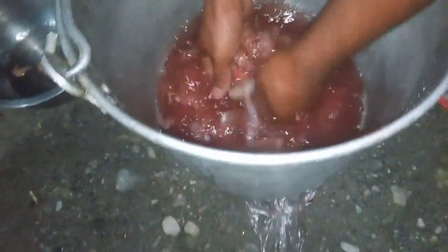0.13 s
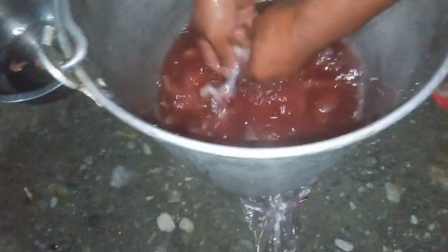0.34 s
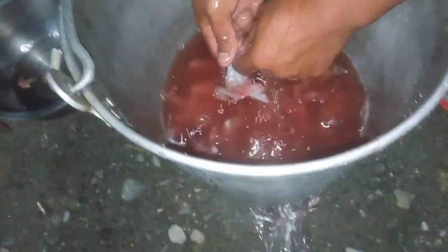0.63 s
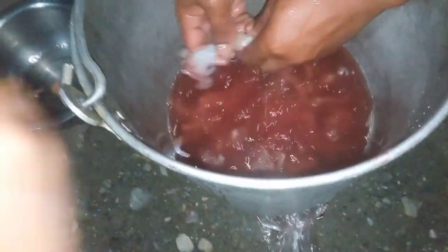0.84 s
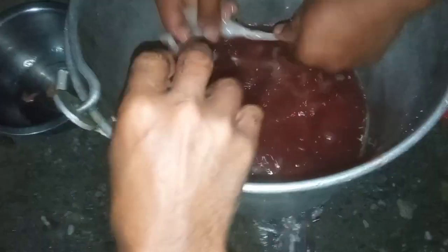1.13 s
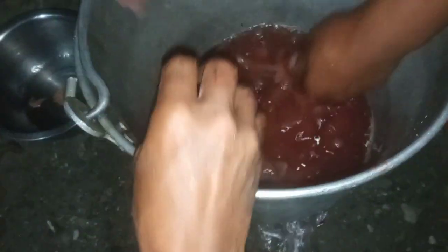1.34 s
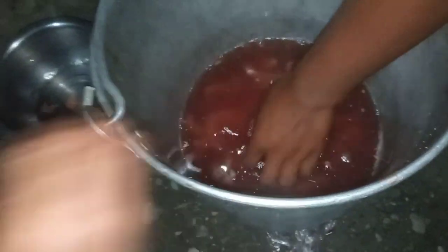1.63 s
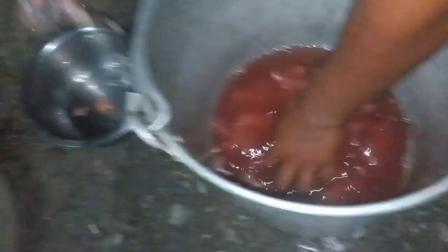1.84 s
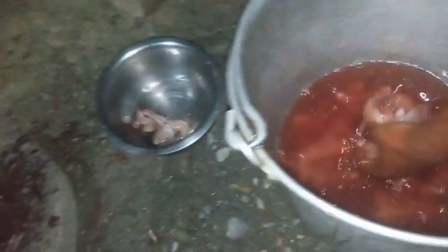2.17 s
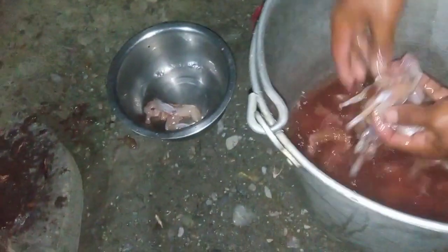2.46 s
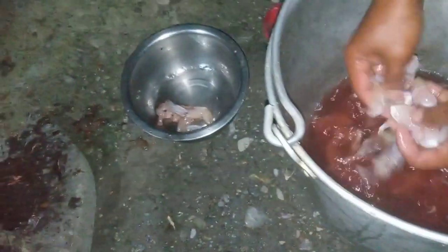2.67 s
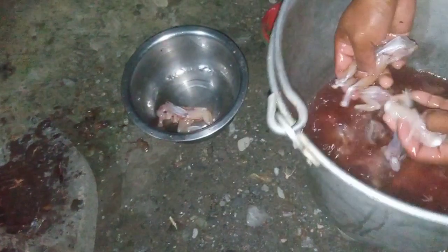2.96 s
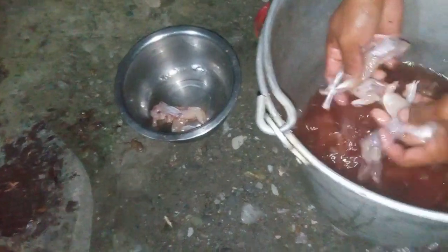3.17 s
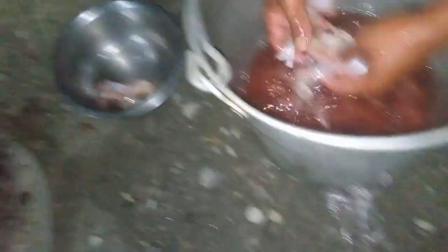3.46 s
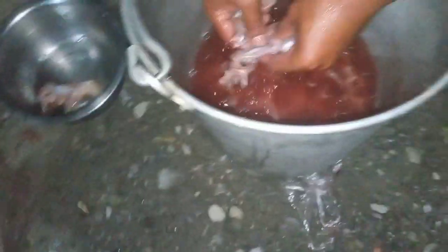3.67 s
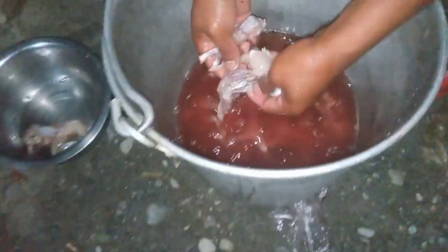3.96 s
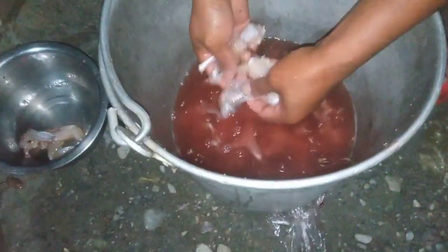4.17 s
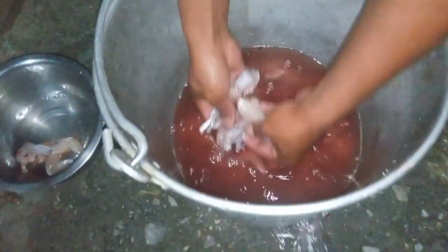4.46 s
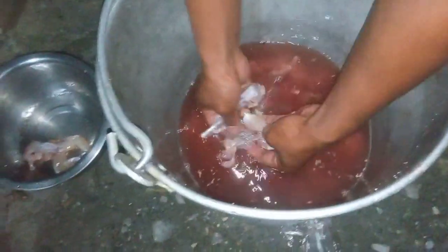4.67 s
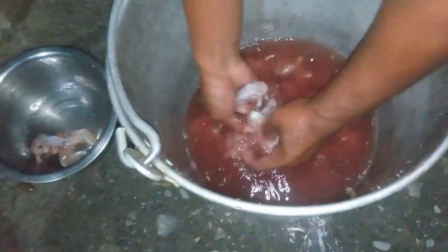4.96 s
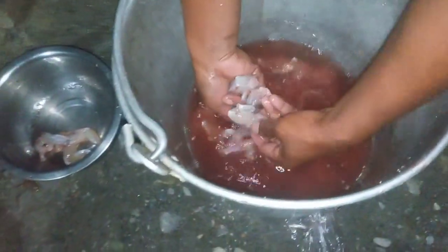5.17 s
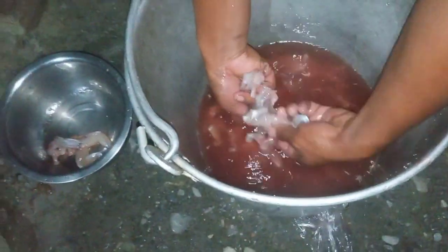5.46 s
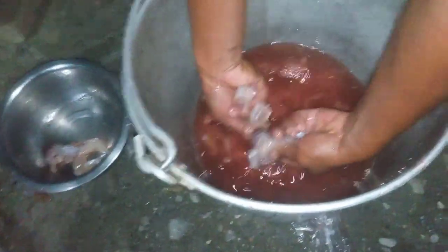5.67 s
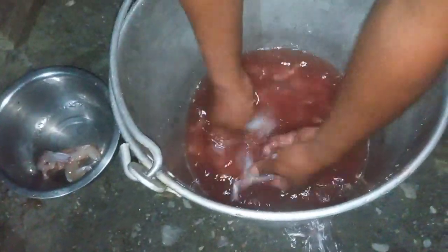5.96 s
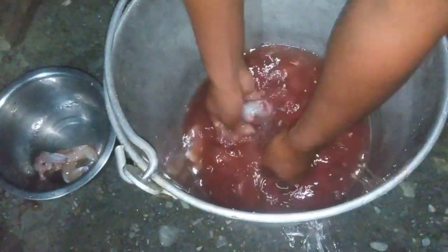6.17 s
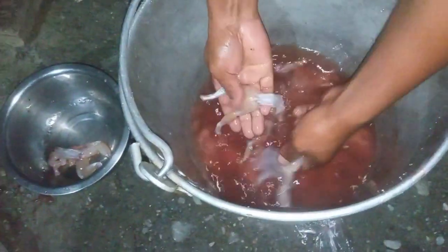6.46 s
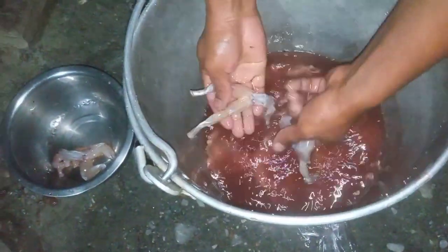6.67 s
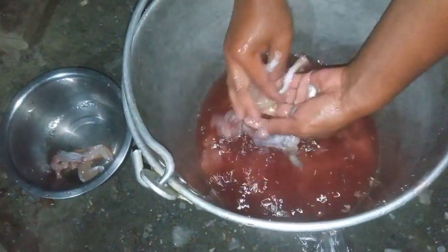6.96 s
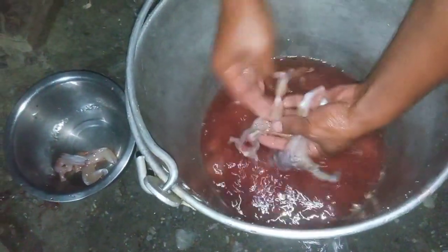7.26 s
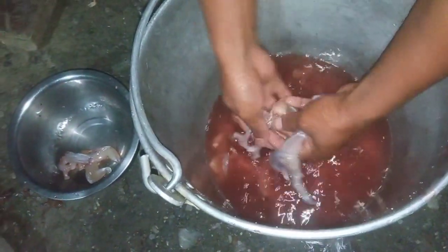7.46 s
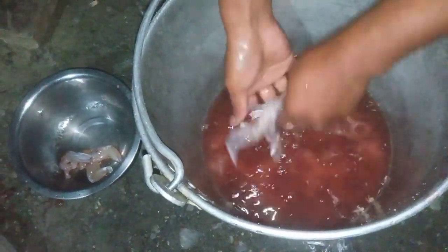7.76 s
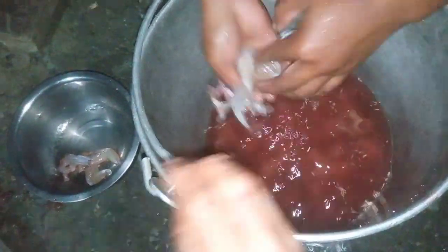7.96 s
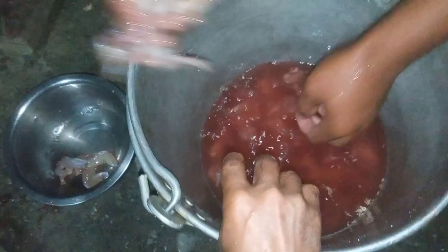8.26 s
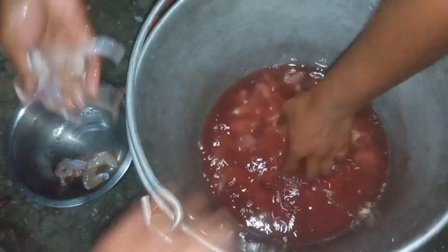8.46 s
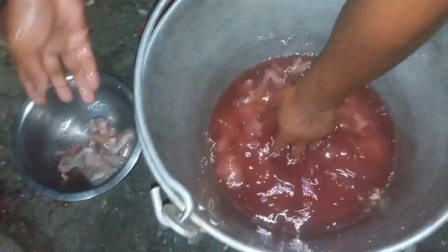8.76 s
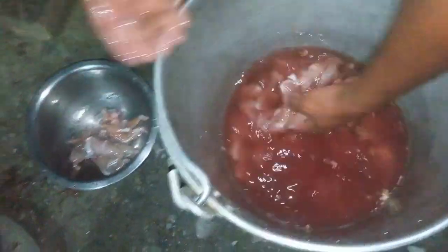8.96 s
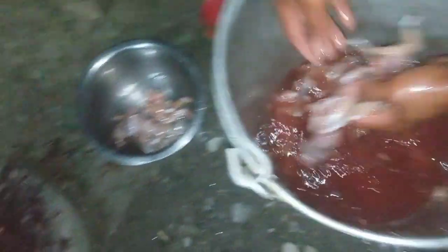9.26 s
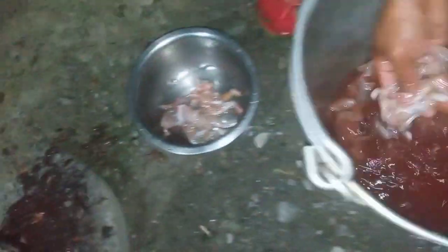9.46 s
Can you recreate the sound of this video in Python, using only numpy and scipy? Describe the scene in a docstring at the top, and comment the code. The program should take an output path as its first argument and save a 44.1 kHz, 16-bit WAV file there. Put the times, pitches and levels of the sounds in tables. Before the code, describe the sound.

Outdoors at night, wet meat is squeezed and swished in a bucket, the water sounding close with a short metallic-walled echo. Crackling squelches, rising bubble plops, sharp wet snaps and one water slap midway stand out. Two splatting landings ring a small steel bowl, the later one preceded by soft rim knocks. Dull microphone bumps and steady high insect buzzing lie underneath.

```python
"""Two hands rinse and squeeze pieces of meat in a metal bucket of water, outdoors at night.
Strokes drive gurgle, squelch and lapping, built from crowds of ringing bubbles and crackling clicks.
Plops, drips, snaps and a water slap stand out; twice a handful is slapped into a bowl of decaying modes.
The bucket is knocked and rubbed; dull thuds, from the hand-held microphone or wet slaps, are filtered clicks.
Insects buzz and crickets chirp as narrow resonances and tones over the broadband night air."""
import sys
import numpy as np
from scipy import signal
from scipy.fft import rfft, irfft, next_fast_len
from scipy.io import wavfile

SR = 44100
rng = np.random.default_rng(int(sys.argv[2]) if len(sys.argv) > 2 else 0)


def output_pcm(signal):
    """Save a mono or channel-first signal as 16-bit PCM at the path in sys.argv[1].

    Samples are clipped to [-1, 1] before scaling.
    """
    pcm = np.clip(np.atleast_2d(signal).T, -1, 1) * 32767
    wavfile.write(sys.argv[1], SR, np.round(pcm).astype(np.int16))


N = 423801
TIME = np.arange(N) / SR
AGE = TIME[:SR // 8]   # time since the onset of a short event


def from_db(db):
    """Logarithmic level: decibels to amplitude gain."""
    return 10 ** (np.asarray(db) / 20)


def rms_one(x):
    """Power normalisation: scale to unit mean square."""
    return x / np.sqrt(np.mean(x ** 2) + 1e-20)


def in_time(rows):
    """Linear interpolation: each column of a curve at every sample."""
    s, *columns = np.transpose(rows)
    return [np.interp(TIME, s, column) for column in columns]


def add(track, s, sound):
    """Superposition: mix a sound in at a given time."""
    at = int(np.clip(s * SR, 0, N - 1))
    track[at:at + len(sound)] += sound[:N - at]


def fade(age, t60):
    """Exponential decay: the level falls 60 dB in t60 seconds."""
    return np.exp(-np.log(1000) * age / t60)


def butter(x, hz, kind, order=2):
    """Maximally flat filtering: a causal Butterworth filter."""
    return signal.sosfilt(signal.butter(order, hz, kind, fs=SR, output="sos"), x)


def resonate(x, hz, width_hz):
    """Damped resonance: one pole pair with unit gain at its peak."""
    r = np.exp(-np.pi * width_hz / SR)
    zeros = np.array([1, 0, -1]) * (1 - r * r) / 2
    poles = [1, -2 * r * np.cos(2 * np.pi * hz / SR), r * r]
    return signal.lfilter(zeros, poles, x + 1e-18)


def coloured(x, spectrum):
    """Spectral shaping: weight a steady texture by a spectrum and scale it to rms 1."""
    hz, level_db = np.transpose(spectrum)
    size = next_fast_len(N)
    bins = np.arange(size // 2 + 1) * SR / size
    gain = from_db(np.interp(np.log(bins + 1), np.log(hz), level_db))
    return rms_one(irfft(rfft(x, size) * gain, size)[:N])


def crackle(per_s, spread_db):
    """Random impulse train: clicks at chance moments, many small and a few large."""
    born = rng.random(N) < per_s / SR
    sign = rng.choice([-1, 1], N)
    return born * sign * from_db(spread_db * np.minimum(rng.exponential(1, N), 4))


# strokes of the hands through the water; the row at 8.35 s is low rubbing noise of the bucket:
# start t/s, length/s, then gurgle, squelch and low swell (lapping or rubbing), each as relative level/dB
STROKES_AND_RUBBING = [(0.0, .17, -51.5, -54.5, -60), (.21, .19, -54, -67, -70),
                       (1.15, 0.34, -81, -69, -72.5), (1.553, 0.18, -89.5, -82.5, -71.5),
                       (2.074, 0.11, -68, -59, -65.5), (2.171, 0.11, -59.5, -60, -67),
                       (2.357, 0.28, -65, -61.5, -82), (2.68, .15, -60, -55.5, -76),
                       (2.884, 0.12, -61.5, -61, -60.5), (3.04, .08, -50, -55.5, -59),
                       (3.207, 0.036, -75, -58.5, -78.5), (3.47, 0.058, -52.5, -56.5, -63),
                       (3.66, 0.042, -59.5, -59.5, -62), (4.033, 0.056, -68, -63, -66),
                       (4.746, .06, -67.5, -61.5, -79), (4.907, .06, -55.5, -56.5, -69),
                       (4.969, .14, -52.5, -51, -53.5), (5.17, 0.17, -65, -58, -75),
                       (5.418, 0.2, -76.5, -65, -82.5), (5.95, 0.24, -51, -55.5, -87),
                       (6.256, 0.14, -52.5, -58, -79), (6.61, 0.16, -72.5, -65, -90.5),
                       (7.053, 0.13, -74, -63, -76.5), (7.282, .1, -85.5, -82.5, -67.5),
                       (8.35, 0.53, -72, -80, -59.5), (8.794, 0.13, -53, -61.5, -53.5),
                       (9.168, 0.28, -56, -57.5, -70), (9.44, .19, -51.5, -51, -50)]
STROKE_ATTACK_S = 0.0083
FIZZ_T60_S, LOW_T60_S = 0.26, .35   # gurgle and squelch die away soon, the low swell more slowly
IDLE_DB = [[-93.5], [-81], [-89]]   # gurgle, squelch and low swell between strokes, relative level/dB


def stirring():
    """Power summation: each movement swells, holds and then decays; returns three levels in dB."""
    power = from_db(IDLE_DB) ** 2 * np.ones(N)
    age = TIME[:SR]
    for s, length_s, *levels_db in STROKES_AND_RUBBING:
        for track, db, t60 in zip(power, levels_db, (FIZZ_T60_S, FIZZ_T60_S, LOW_T60_S)):
            attack = np.minimum(age / STROKE_ATTACK_S, 1)
            envelope = attack * fade(np.maximum(age - length_s, 0), t60)
            add(track, s, (from_db(db) * envelope) ** 2)
    return 10 * np.log10(power)


def bubble(hz, t60, rise, swell_s):
    """Volume resonance: a bubble's ring swells, then dies while its pitch climbs towards the surface."""
    age = AGE[:int(t60 * SR) + 2]
    pitch = hz * (1 + rise * (age / t60 - .12))
    tone = np.sin(2 * np.pi * np.cumsum(pitch) / SR)
    return tone * fade(age, t60) * (1 - np.exp(-age / swell_s))


def gurgle(level_db, per_s, spread_db, low_hz, high_hz, cycles, rise):
    """Incoherent sum of bubbles: a crowd of rising rings, thicker the higher the level."""
    out = np.zeros(N)
    crowding = np.clip(from_db(.5 * (level_db - level_db.max())), .04, 1)
    for when, luck, size, strength, life in rng.random((int(per_s * N / SR), 5)):
        share = crowding[int(when * N)]
        if luck < share:
            hz = low_hz * (high_hz / low_hz) ** size
            t60 = min(cycles * (.5 + life) / hz, AGE[-1])
            ring = bubble(hz, t60, rise, swell_s=1 / hz)
            # sparse bubbles are made stronger, so that crowding leaves the mean power alone
            add(out, when * N / SR, from_db(spread_db * strength) / np.sqrt(share) * ring)
    return from_db(level_db) * rms_one(out)


# spectrum that shapes the squelch: f/Hz, relative level/dB
SQUELCH_SPECTRUM = [(200, -28.5), (600, -4.5), (1500, -11), (3000, 5), (4200, -3.5), (5200, 9), (7000, -8),
                    (8200, -8), (10000, -16.5), (12500, -31)]


def squelch(level_db):
    """Shaped impulse noise: dense wet clicks follow the squeezing."""
    return from_db(level_db) * coloured(crackle(per_s=3000, spread_db=3.5), SQUELCH_SPECTRUM)


# spectrum that shapes fine spray, also in drips and snaps: f/Hz, relative level/dB
SPRAY_SPECTRUM = [(5000, -16), (9000, -6.5), (11000, -8), (12800, -10), (13900, -21.5), (14700, 12.5),
                  (15400, -3.5), (16000, -13)]


def fine_spray(level_db):
    """Small bubbles ring high: a shaped crowd of them goes with the squeezing."""
    mist = gurgle(0 * TIME, per_s=600, spread_db=22, low_hz=8500, high_hz=16000, cycles=45, rise=.04)
    return from_db(level_db) * coloured(mist, SPRAY_SPECTRUM)


# large air bubbles trapped by drips and fingers: t/s, relative peak level/dB, f/Hz
LARGE_BUBBLES = [(0.115, -32, 1414), (0.145, -36, 2020), (0.222, -34.5, 2067), (0.317, -18.5, 1590),
                 (0.397, -44, 1150), (0.555, -38, 1817), (0.962, -34, 2200), (1.214, -35.5, 1298),
                 (1.403, -47, 1710), (2.408, -38.5, 2055), (2.462, -36.5, 1944), (2.597, -43, 1260),
                 (2.733, -27.5, 1650), (2.822, -39, 1210), (2.904, -28, 660), (3.056, -26.5, 2304),
                 (3.716, -46, 1154), (4.773, -39.5, 1174), (4.794, -31, 2100), (4.902, -32.5, 1120),
                 (5.001, -33, 2020), (5.261, -39.5, 1895), (5.36, -44, 930), (5.591, -41, 1715),
                 (5.965, -38, 1334), (6.055, -34.5, 1766), (6.121, -29.5, 2220), (6.274, -34.5, 1350),
                 (6.356, -40, 1160), (6.389, -29, 2080), (6.461, -42, 2020), (6.727, -40.5, 1500),
                 (6.792, -29, 2384), (7.131, -27, 1574), (8.092, -43, 1387), (9.154, -35.5, 1566),
                 (9.19, -33.5, 2560), (9.237, -27.5, 1507), (9.359, -34, 1534), (9.419, -42, 2070),
                 (9.507, -35, 977)]
PLOP_CYCLES = 67.5   # cycles in which a ring decays by 60 dB, so low ones last longer
PLOP_RISE = .11   # mean share by which the pitch climbs meanwhile


def plops(level_db, swell_s, split_db, split_rise):
    """Volume resonance of single bubbles: each stands out and two weaker ones split off just after."""
    out = np.zeros(N)
    for s, db, hz in LARGE_BUBBLES:
        ring = bubble(hz, PLOP_CYCLES / hz, PLOP_RISE * rng.uniform(.3, 1.7), swell_s)
        add(out, s, from_db(db + level_db) * ring / np.abs(ring).max())
        # delay in s, pitch ratio, level change in dB
        for delay, ratio, change_db in rng.uniform([.003, .85, -5], [.026, 1.6, 5], (2, 3)):
            split = bubble(hz * ratio, PLOP_CYCLES / (hz * ratio), split_rise, swell_s)
            add(out, s + delay, from_db(db + split_db + change_db) * split)
    return out


# loudest wet films snapping, drops landing, and one sharp slap of water at 5.14 s:
# t/s, centre f/Hz, level over 10 ms/dB, t60/s, spray level relative to the snap/dB
WET_SNAPS = [(0.1096, 4100, -37, .016, -7), (.1332, 4480, -33.5, 0.028, -16), (.3156, 3870, -42, .009, -14),
             (0.3748, 3890, -41.5, .016, -13), (1.2, 4060, -39, 0.042, -0.5),
             (2.1378, 4200, -38, .031, -17.5), (2.7207, 5950, -39.5, 0.022, -6),
             (2.8216, 6130, -45, .016, -5), (2.9366, 4400, -38, 0.011, -0.5), (3.052, 3440, -38.5, .05, 2),
             (3.067, 4130, -38, 0.019, -3), (3.118, 6550, -40.5, 0.028, -3),
             (3.26, 5670, -36.5, 0.015, -14), (3.858, 5450, -45, 0.011, -4),
             (4.7116, 5240, -43.5, .011, -9), (4.904, 5100, -38.5, .034, -2),
             (4.9742, 5100, -35.5, 0.0034, -27), (4.9958, 4870, -34.5, 0.013, -9),
             (5.0057, 5160, -31, .01, -24), (5.142, 5340, -27.5, 0.0033, -47),
             (5.143, 2050, -42, 0.0068, -25), (5.2619, 5800, -45.5, .007, -1),
             (5.5504, 4900, -43.5, 0.031, -6), (6.0312, 4870, -39, 0.021, -1),
             (6.085, 4500, -38, 0.013, -25), (6.115, 4440, -36, 0.027, -11), (6.1457, 2960, -36, .015, -24),
             (6.3885, 4540, -44, 0.013, -18), (6.7924, 5470, -41.5, 0.016, -6),
             (6.869, 4700, -48, 0.026, -20), (6.9032, 4770, -36.5, 0.028, -10),
             (7.0888, 4360, -42, .024, -7), (7.1296, 4200, -34, .008, -5), (8.286, 3700, -31, 0.077, -27),
             (8.398, 3770, -50.5, 0.042, 9.5), (8.7592, 6700, -41, 0.085, 0),
             (9.2086, 3800, -40.5, 0.013, -8), (9.359, 4700, -41, 0.019, -18),
             (9.444, 4610, -46, 0.015, -12), (9.548, 4200, -36, 0.049, 2.5)]


def snaps(level_db, width_hz, patter, skirt_db, spray_db):
    """Impulse response of a narrow band: one sharp click and a decaying patter ring it wetly."""
    out = np.zeros(N)
    spray = coloured(rng.standard_normal(N), SPRAY_SPECTRUM)
    for s, hz, db, t60, fine_db in WET_SNAPS:
        burst = patter * rng.standard_normal(len(AGE)) * fade(AGE, t60)
        burst[0] += 1
        width = width_hz * rng.uniform(.45, 1.1)
        ring = rms_one(butter(burst, [hz - width / 2, hz + width / 2], "band"))
        skirt = rms_one(butter(burst, [hz / 2.5, hz * 1.5], "band"))
        piece = spray[rng.integers(N - len(AGE)):][:len(AGE)]
        mist = rms_one(piece * fade(AGE, t60))
        sound = ring + from_db(skirt_db) * skirt + from_db(fine_db + spray_db) * mist
        # refer the energy to 10 ms
        add(out, s, from_db(db + level_db) * sound * np.sqrt(.01 / AGE[-1]))
    return out


# water dripping off the lifted meat: t/s, relative level/dB
DRIP_LEVEL = [(0, -62), (1.4, -65), (1.9, -76), (2.6, -69), (3.4, -65), (4.4, -66.5), (5.2, -70),
              (5.8, -67), (6.8, -55), (7.8, -88), (8.3, -74.5), (9.61, -43)]


def drips(tick_db, plink_db):
    """Random arrivals: tiny drops leave ticks of fine spray and plinks of very small bubbles."""
    level_db, = in_time(DRIP_LEVEL)
    ticks = coloured(crackle(per_s=22, spread_db=2.5), SPRAY_SPECTRUM)
    ticks = butter(ticks, 12000, "high", order=1)
    plinks = gurgle(level_db, per_s=45, spread_db=12, low_hz=2700, high_hz=7500, cycles=50, rise=.1)
    return from_db(level_db + tick_db) * ticks + from_db(plink_db) * plinks


def bucket_echo(x, wet_db, t60, wall_hz):
    """Reverberation: convolution with a decaying noise tail, as sound bounces between the bucket's walls."""
    age = TIME[:SR // 3]
    tail = butter(rng.standard_normal(SR // 3), [450, wall_hz], "band", order=1) * fade(age, t60)
    tail[:int(.002 * SR)] = 0   # first trip across the bucket
    tail /= np.sqrt(np.sum(tail ** 2))
    return x + from_db(wet_db) * signal.fftconvolve(x, tail)[:N]


def water_in_bucket():
    """Superposition: water sounds and the low rubbing swell share the bucket's reverberation."""
    gurgle_db, squelch_db, low_db = stirring()
    water = gurgle(gurgle_db + .5, per_s=420, spread_db=22, low_hz=950, high_hz=3450, cycles=42, rise=.26)
    # squelching bubbles, then the low swell
    water += gurgle(squelch_db + 6.5, per_s=600, spread_db=22, low_hz=3275, high_hz=8000, cycles=50, rise=.1)
    water += gurgle(low_db - 3.0, per_s=310, spread_db=12, low_hz=269.2, high_hz=918, cycles=33, rise=.08)
    fizz = rms_one(butter(crackle(per_s=2500, spread_db=3.5), [800, 3300], "band"))
    water += from_db(gurgle_db - 8.5) * fizz
    water += squelch(squelch_db - 2)
    water += fine_spray(squelch_db - 0.5)
    water += drips(tick_db=1.5, plink_db=0.5)
    water += plops(level_db=-1.2, swell_s=.0007, split_db=-15, split_rise=.36)
    water += snaps(level_db=0, width_hz=1800, patter=.26, skirt_db=-12, spray_db=-2)
    return bucket_echo(water, wet_db=-11, t60=0.054, wall_hz=7000)


def struck(hits, modes, contact_s, vary_db):
    """Modal superposition: each soft blow sets all modes ringing, their strengths varied at random."""
    out = np.zeros(N)
    age = TIME[:2 * SR]
    for s, level_db, *_ in hits:
        rings = np.zeros(len(age))
        for hz, db, t60 in modes:
            strength = from_db(db + vary_db * rng.normal())
            rings += strength * np.sin(2 * np.pi * hz * age) * fade(age, t60)
        add(out, s, from_db(level_db) * rings * (1 - np.exp(-age / contact_s)))
    return out


# meat landing in the bowl: t/s, relative thud level/dB, splat level/dB, splat t60/s
MEAT_LANDINGS = [(2.1595, -11, -28.5, .03), (2.166, -25, -24, .03), (2.184, -27, -33, .07),
                 (8.761, -35, -48, .08), (8.8225, -20, -24, .03), (8.8472, -21, -23, .052),
                 (8.877, -30, -42, .06)]
# spectrum that shapes the splat: f/Hz, relative level/dB
SPLAT_SPECTRUM = [(200, -21.5), (600, 1.5), (1200, -10), (2200, 6.5), (3600, -12.5), (4500, 3), (5300, 4.5),
                  (7500, -7), (9000, -6), (12800, -18.5), (14900, 1), (16000, -29)]


def splats(swell_s):
    """Amplitude-modulated noise: water is squeezed out from under each piece of meat as it lands."""
    force = np.zeros(N)
    for s, _, db, t60 in MEAT_LANDINGS:
        blow = fade(AGE, t60) * (1 - np.exp(-AGE / swell_s))
        add(force, s, from_db(db) * blow / blow.max())
    return force * coloured(rng.standard_normal(N), SPLAT_SPECTRUM)


# steel bowl, bottom deadened by meat and rim ringing on: f/Hz, relative level/dB, t60/s
BOWL_MODES = [(518, -36, 1.57), (612, -3.5, 0.047), (617.4, -39.5, 0.631), (710, -6.5, 0.034),
              (850, -33.5, 0.042), (1278, -41, 0.68), (1938, -56, 0.98), (2100, -23, 0.057)]


def slapped_bowl():
    """Modal excitation: the landing meat rings the bowl's modes and splats."""
    return struck(MEAT_LANDINGS, BOWL_MODES, contact_s=.0014, vary_db=.8) + splats(swell_s=.0018)


# the bucket's modes: f/Hz, relative level/dB, t60/s
BUCKET_MODES = [(222, 7.5, 0.36), (244, 6.5, 0.65), (361, 4.5, 0.63), (670, 5, 0.5), (674, -14, 0.65),
                (790, 1, 1), (813, -5, 1), (800, -6, 0.36), (1170, 8.5, 0.21), (1460, 3, 0.24)]
# the hand rubs along the rim: t/s, pressure (0-1)
RUB_PRESSURE = [(8.58, 0), (8.6, 0.52), (8.655, 0.75), (8.7, 0.32), (8.74, 0)]


def rim_rub(scrape_db, groan_db):
    """Stick-slip friction: a grainy scrape of skin above, the groan of the bucket's wall below."""
    scrape = rms_one(butter(crackle(per_s=4000, spread_db=2.0), [900, 5500], "band"))
    slips = crackle(per_s=280, spread_db=3.0)
    groan = rms_one(sum(resonate(slips, hz, 58) for hz, _, _ in BUCKET_MODES))
    pressure, = in_time(RUB_PRESSURE)
    return pressure * (from_db(scrape_db) * scrape + from_db(groan_db) * groan)


# a hand knocks the bucket's rim and handle: t/s, relative level/dB
RIM_KNOCKS = [(8.272, -59.5), (8.58, -59.5), (8.64, -61.5)]


def handled_bucket():
    """Modal excitation and friction: the bucket's wall is knocked and rubbed."""
    knocks = struck(RIM_KNOCKS, BUCKET_MODES, contact_s=0.0016, vary_db=5.0)
    return knocks + rim_rub(scrape_db=-45, groan_db=-51)


# dull thuds: bumps on the microphone's case, and wet slaps or water thuds near 3.1 and 3.5 s:
# t/s, relative peak level/dB, upper edge f/Hz
DULL_THUDS = [(.008, -36.5, 1280), (.035, -40, 900), (1.115, -41, 400), (3.065, -25.5, 1380),
              (3.102, -38.5, 855), (3.494, -38, 480), (3.511, -27.5, 1070), (3.841, -45, 537),
              (4.179, -36.5, 423), (4.207, -44, 470), (4.232, -42, 440), (4.377, -44, 250),
              (4.412, -44.5, 450), (4.527, -47, 200), (4.773, -40.5, 1200), (5.293, -44.5, 1180),
              (6.214, -44, 348), (6.255, -45.5, 424), (8.212, -45, 221.3), (8.269, -30.5, 560),
              (8.487, -48, 560), (8.529, -44.5, 567), (8.579, -40, 517), (8.601, -39.5, 800),
              (8.656, -37, 600), (9.416, -42.5, 520), (9.565, -45, 706)]
STUTTER_S, STUTTER_LOSS_DB = .021, 9   # each thud repeats twice more, weaker each time


def thuds(level_db, body_hz, body_width_hz, body_db, rub, bass_share):
    """Impact on a low resonance: ticks, a short rub and a wobble; bright thuds have less bass."""
    out = np.zeros(N)
    for s, db, hz in DULL_THUDS:
        impact = rub * rng.standard_normal(len(AGE)) * fade(AGE, 0.12)
        impact[0] += 1
        for k in (1, 2):
            repeat_s = (k + rng.uniform(-.25, .25)) * STUTTER_S
            impact[int(repeat_s * SR)] += from_db(-k * STUTTER_LOSS_DB)
        tick = butter(impact, [hz * min(bass_share, .5), hz], "band")
        tick = tick + from_db(body_db) * resonate(tick, body_hz, body_width_hz)
        add(out, s, from_db(db + level_db) * tick / np.abs(tick).max())
    return out


RUMBLE_DB, RUMBLE_SWELL_S = -80.5, 0.33   # steady rumble, and the length of its swell around a thud
RUMBLE_BELOW_THUD_DB = 33.5   # below the thud's table level, itself capped at -38 dB


def grip():
    """Amplitude-modulated noise: the hand on the microphone rumbles faintly, and more around each thud."""
    force = np.full(N, from_db(RUMBLE_DB))
    swell = np.hanning(int(RUMBLE_SWELL_S * SR))
    for s, db, _ in DULL_THUDS:
        add(force, s - RUMBLE_SWELL_S / 2, from_db(min(db, -38) - RUMBLE_BELOW_THUD_DB) * swell)
    return force * rms_one(butter(rng.standard_normal(N), [65, 200], "band"))


def thuds_and_grip():
    """Superposition of low sounds: dull thuds and the rumble of the grip."""
    ticks = thuds(level_db=3.5, body_hz=109.0, body_width_hz=41, body_db=2.5, rub=0.047, bass_share=0.1)
    return ticks + grip()


# buzzing insects: carrier f/Hz, width/Hz, relative rms level/dB, wing-stroke rate/Hz,
# timing jitter (periods)
BUZZING_INSECTS = [(4153, 190, -60.5, 58.53, .0015), (3889, 315, -60.5, 51, 0.15),
                   (5995, 300, -58.5, 76, 0.092), (6587, 510, -59, 63, .15), (9580, 730, -65, 120, 0.31),
                   (10350, 420, -69, 64, .2)]


def insects(stroke_s):
    """Forced resonance: each wing stroke rings the insect's narrow resonator."""
    out = np.zeros(N)
    for hz, width_hz, db, per_s, jitter in BUZZING_INSECTS:
        count = int(per_s * N / SR)
        beats = np.arange(count) + jitter * rng.standard_normal(count)
        at = np.clip(beats * SR / per_s, 0, N - 1).astype(int)
        strokes = np.zeros(N)
        strokes[at] = from_db(rng.standard_normal(count))
        envelope = signal.lfilter([1], [1, -np.exp(-1 / (stroke_s * SR))], strokes)
        rasp = envelope * rng.standard_normal(N)
        rough = np.clip(jitter * 20, .3, .9)   # uneven singers also scrape roughly
        drive = np.sqrt(1 - rough) * rms_one(strokes) + np.sqrt(rough) * rms_one(rasp)
        buzz = butter(drive, [hz - width_hz / 2, hz + width_hz / 2], "band", order=3)
        out += from_db(db) * rms_one(buzz)
    return out


# the insect buzz as the microphone turns: t/s, gain/dB
BUZZ_GAIN = [(0, 4.5), (1.8, 3.5), (3.8, 4), (5.6, 3.5), (7.5, 2), (9.61, 1.5)]


def insect_chorus():
    """Level modulation: the buzzing follows a slow gain curve."""
    gain_db, = in_time(BUZZ_GAIN)
    return from_db(gain_db) * insects(stroke_s=0.029)


def cricket(chirps, level_db, length_s, third_db, waver):
    """Frequency modulation: chirps arch slightly in pitch and waver, with a third harmonic."""
    out = np.zeros(N)
    arch = np.sqrt(np.hanning(int(length_s * SR)) + 1e-9)
    for s, hz in chirps:
        unrest = rms_one(butter(rng.standard_normal(len(arch)), 87, "low"))
        pitch = hz * (1 + 0.0172 * (arch - .8) + waver * unrest)
        phase = 2 * np.pi * np.cumsum(pitch) / SR
        tone = np.sin(phase) + from_db(third_db) * np.sin(3 * phase)
        add(out, s, from_db(level_db) * arch * tone)
    return out


FAR_CHIRP_HZ, FAR_CHIRP_EVERY_S = 3620, 0.36   # a second, fainter cricket sings steadily


def far_chirps():
    """Quasi-periodic series: regular chirps, each a little late and slightly high or low."""
    times = np.arange(0, N / SR, FAR_CHIRP_EVERY_S)
    return [(s + rng.uniform(0, .08), FAR_CHIRP_HZ * rng.normal(1, .008)) for s in times]


# chirps of the nearer cricket: t/s, f/Hz
NEAR_CHIRPS = [(.5, 3871), (1.04, 3830), (3.248, 3950), (3.51, 3895), (3.781, 3930), (4.0, 3800),
               (4.53, 3750), (7.31, 3970), (7.85, 3950), (8.98, 3823)]


def crickets():
    """Superposition of tonal singers: one irregular cricket and a fainter steady one."""
    near = cricket(NEAR_CHIRPS, level_db=-54.5, length_s=0.25, third_db=-20.0, waver=0.0069)
    far = cricket(far_chirps(), level_db=-70, length_s=.28, third_db=0.5, waver=.004)
    return near + far


# spectrum of the night air with its far insects: f/Hz, relative level/dB
NIGHT_SPECTRUM = [(25, -28.5), (90, -6.5), (600, -16), (1100, -23), (2650, -26.5), (2950, -11.5),
                  (3350, -15), (3650, -3.5), (4750, -17), (5600, 2), (7300, -3.5), (8250, -12),
                  (10000, 2.5), (11600, -21.5), (13500, -32.5), (15000, -14.5)]


def night_air():
    """Stationary coloured noise: the steady background of air and far insects."""
    return from_db(-58.0) * coloured(rng.standard_normal(N), NIGHT_SPECTRUM)


def scene():
    """Linear superposition: water, bowl, bucket, thuds and the night around them."""
    water = water_in_bucket()
    bowl = slapped_bowl()
    bucket = handled_bucket()
    handling = thuds_and_grip()
    chorus = insect_chorus() + crickets()
    return (water + bowl + bucket + handling + chorus + night_air())[None]


CUTOFF_HZ = 15650


def record(dry):
    """Band limitation: the sound has little deep bass and ends steeply at the top."""
    bass_cut = butter(dry, 48, "high", order=3)
    # 0.2 dB passband ripple, 75 dB stopband loss
    top_cut = signal.ellip(10, .2, 75, CUTOFF_HZ, fs=SR, output="sos")
    return signal.sosfilt(top_cut, bass_cut)


dry = scene()
out = record(dry)
output_pcm(out)
```